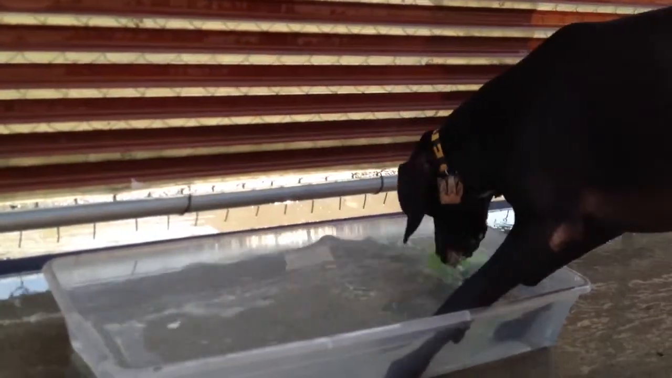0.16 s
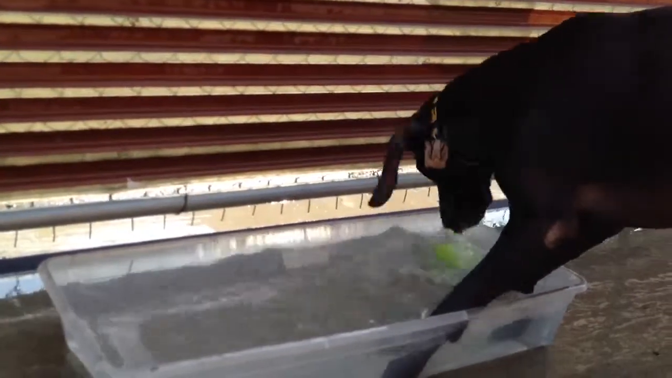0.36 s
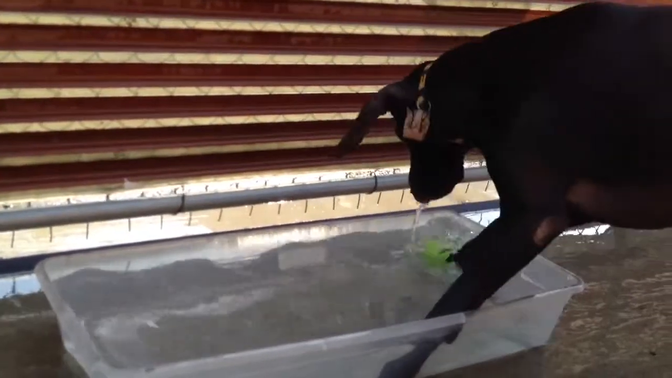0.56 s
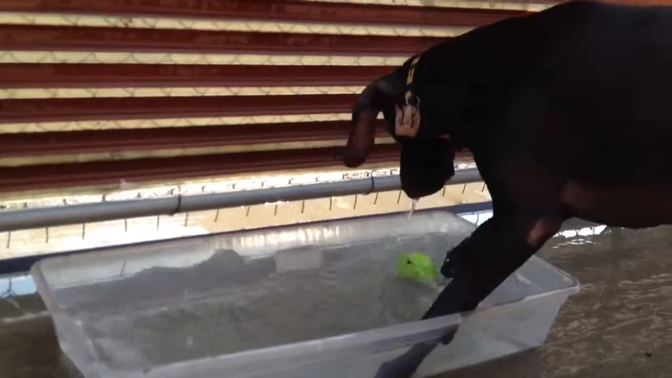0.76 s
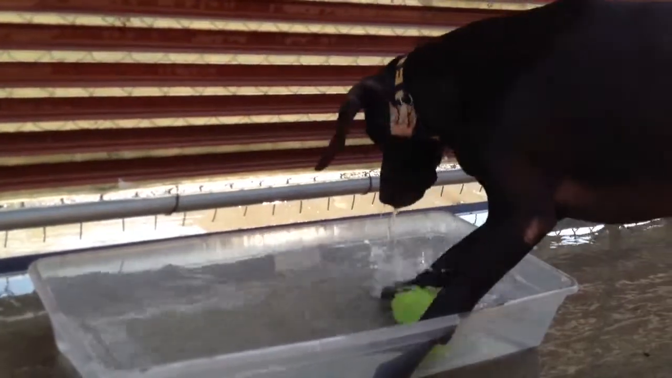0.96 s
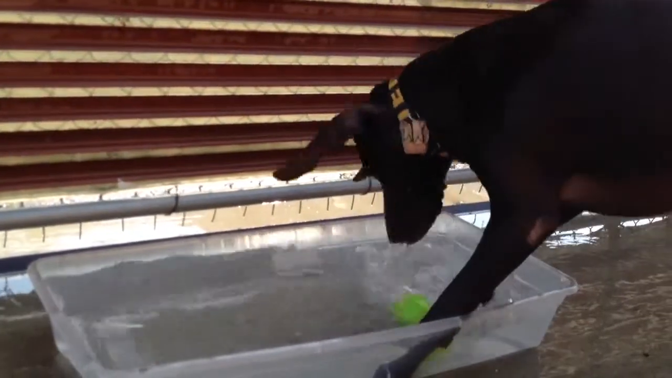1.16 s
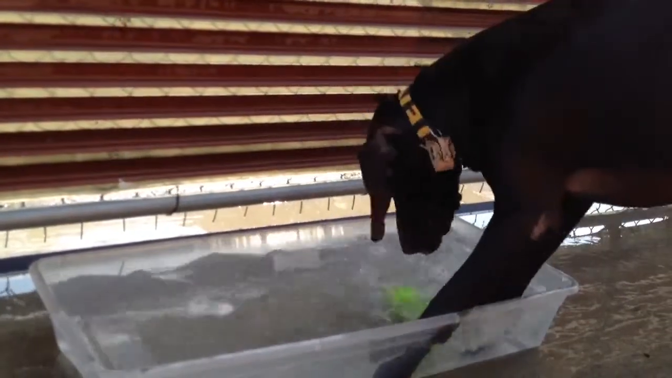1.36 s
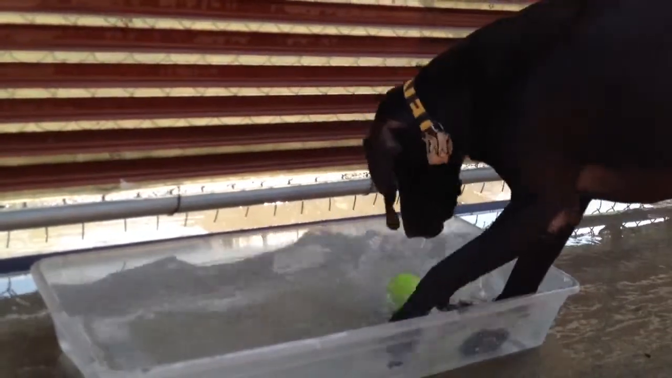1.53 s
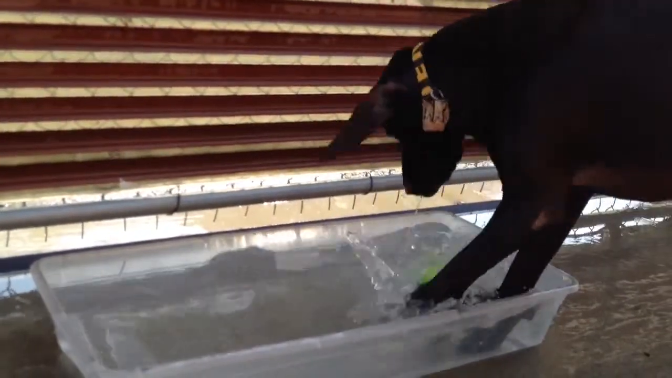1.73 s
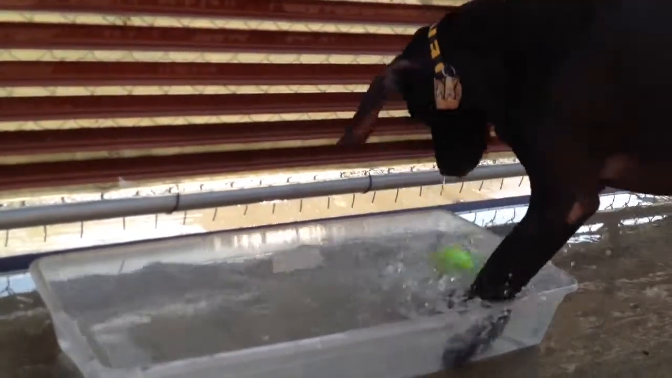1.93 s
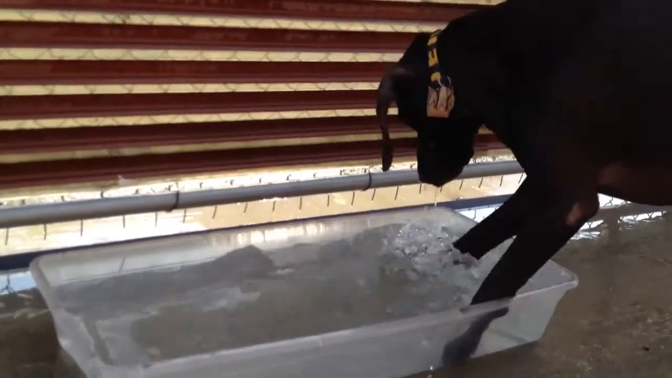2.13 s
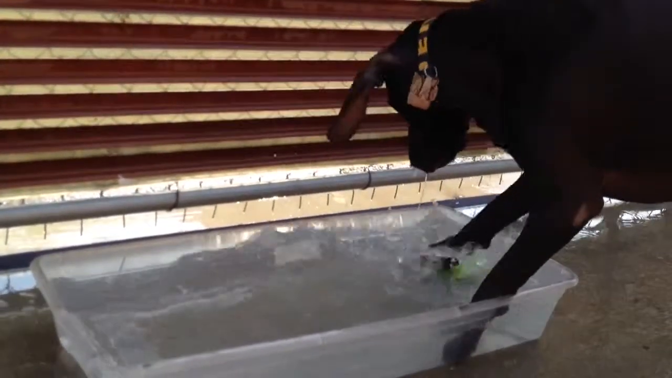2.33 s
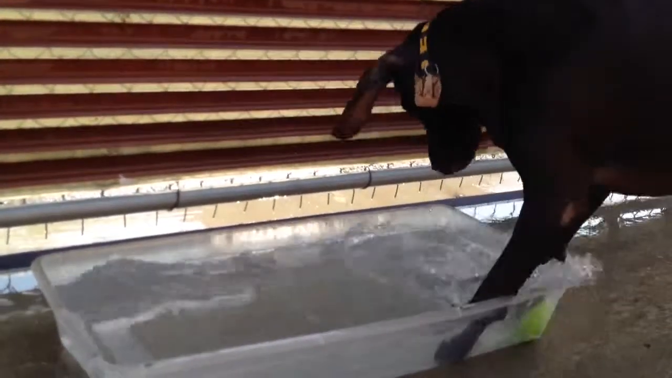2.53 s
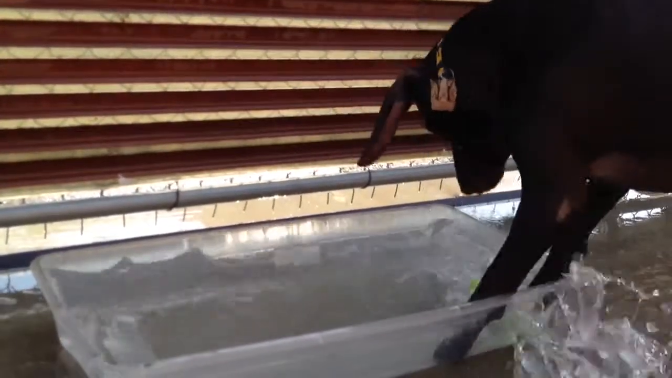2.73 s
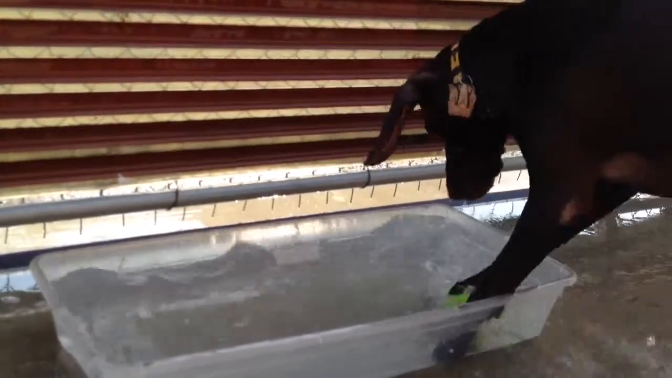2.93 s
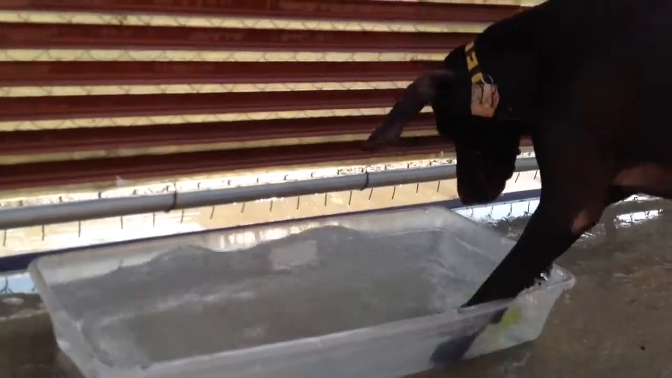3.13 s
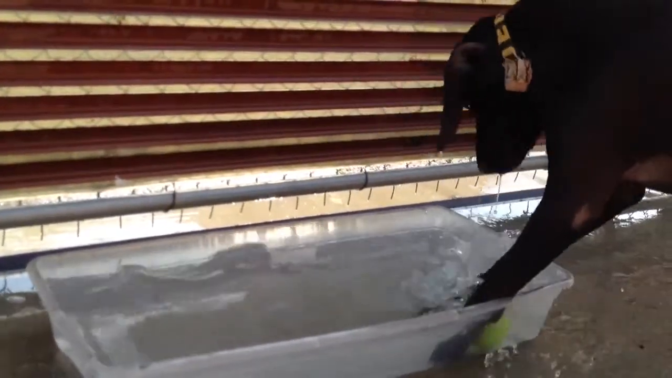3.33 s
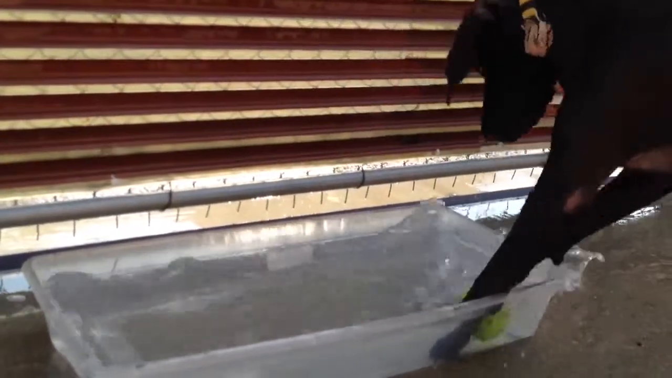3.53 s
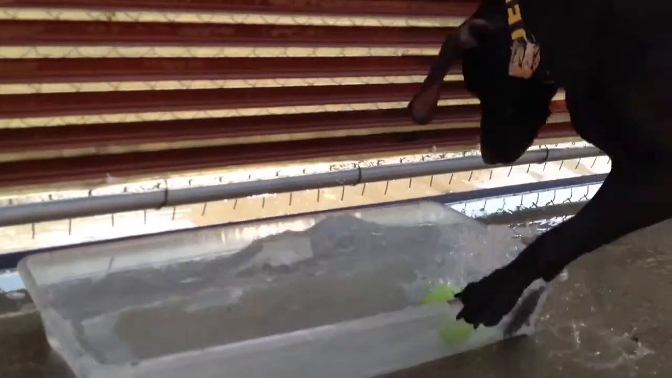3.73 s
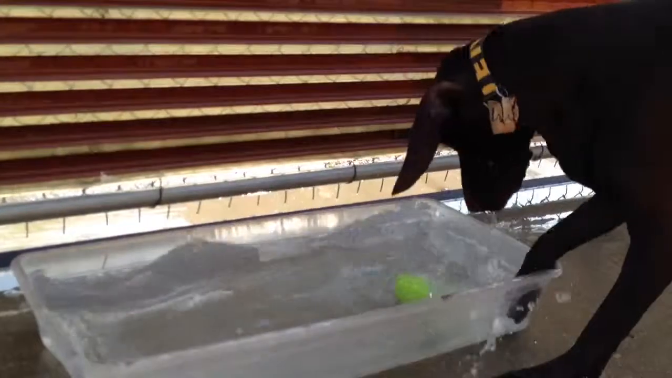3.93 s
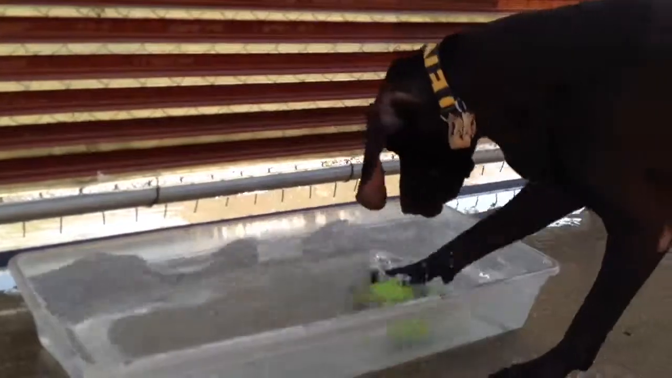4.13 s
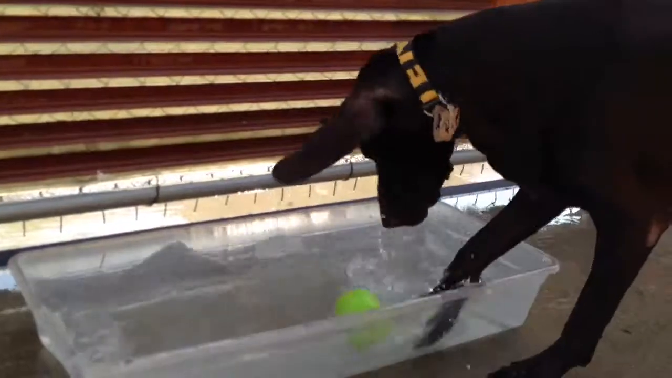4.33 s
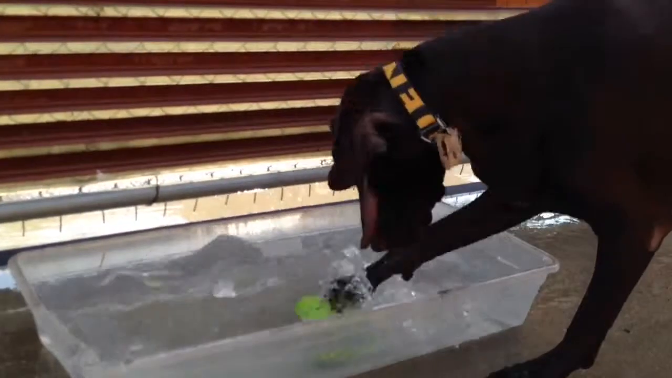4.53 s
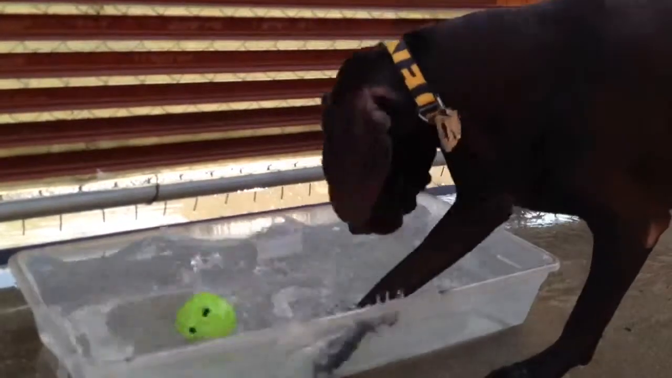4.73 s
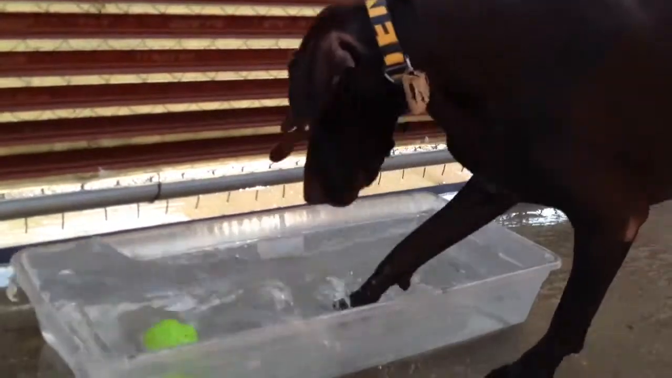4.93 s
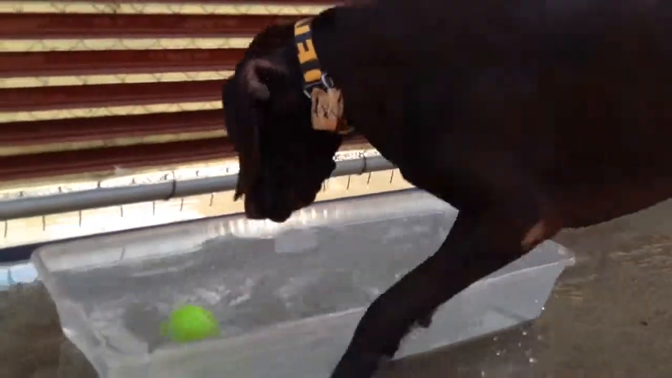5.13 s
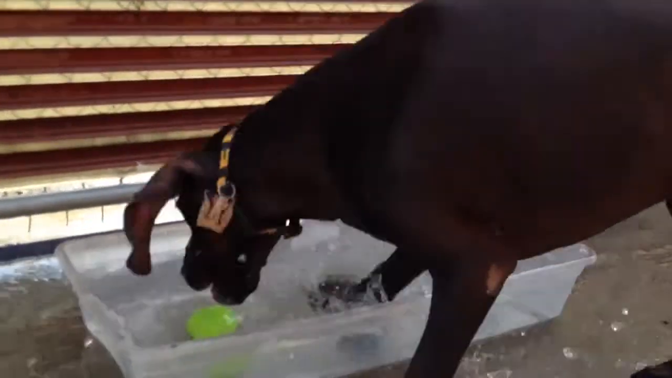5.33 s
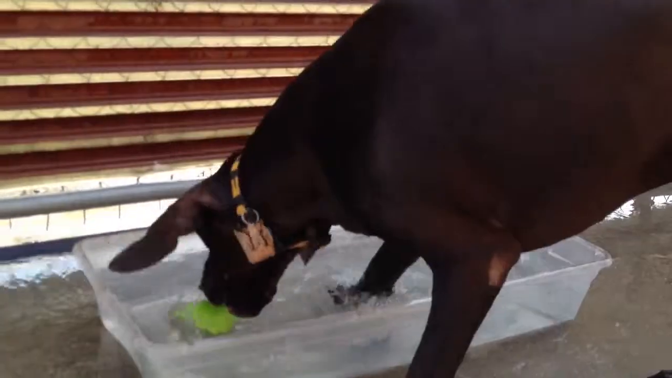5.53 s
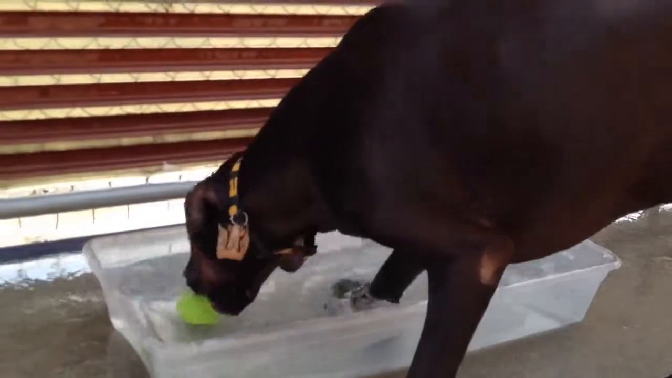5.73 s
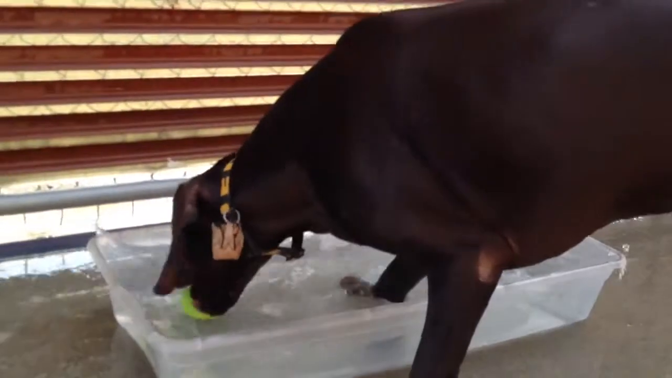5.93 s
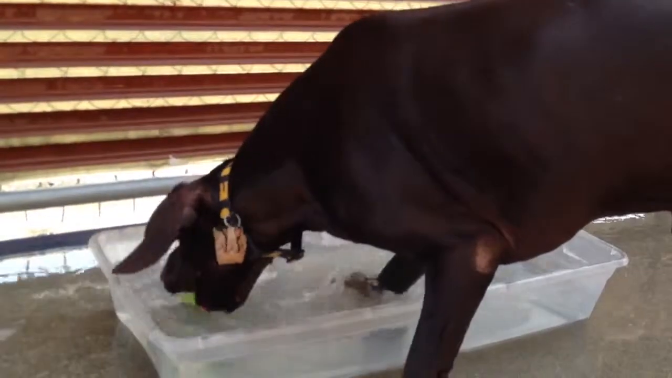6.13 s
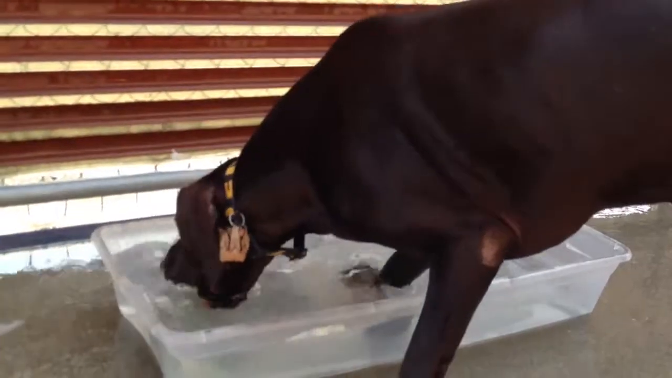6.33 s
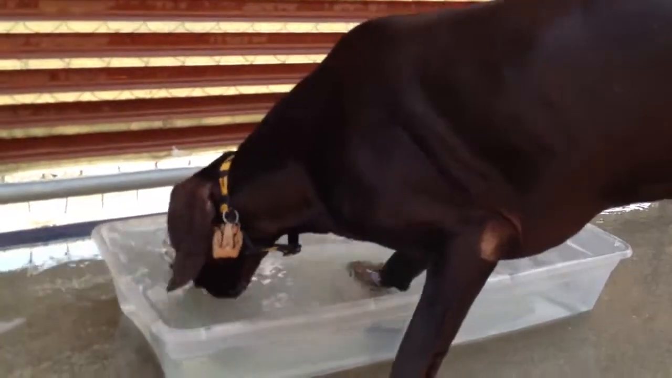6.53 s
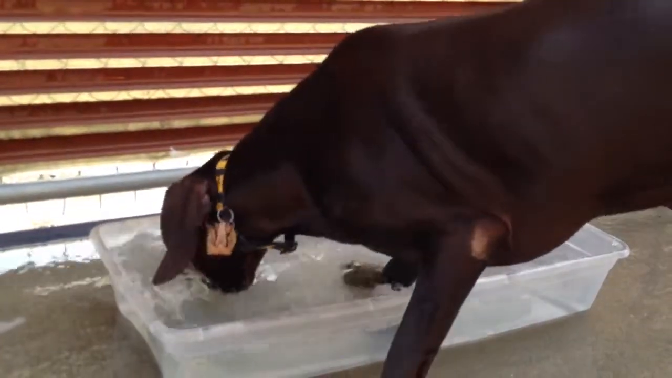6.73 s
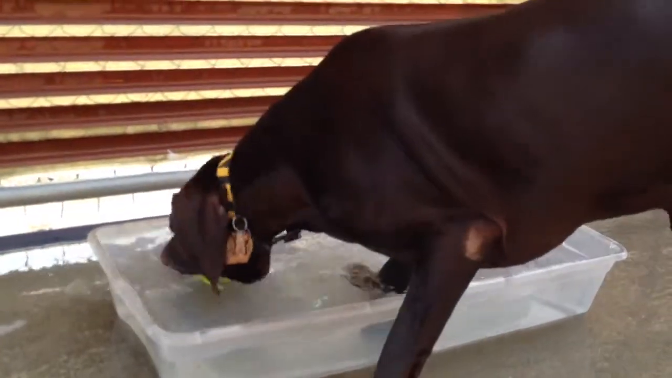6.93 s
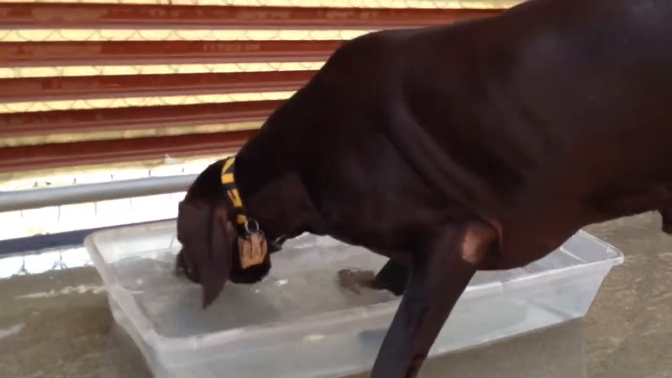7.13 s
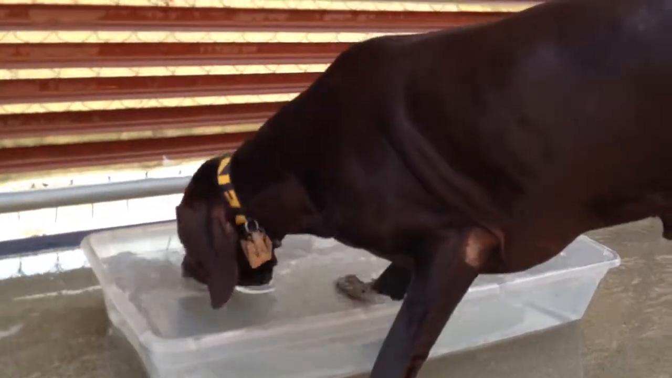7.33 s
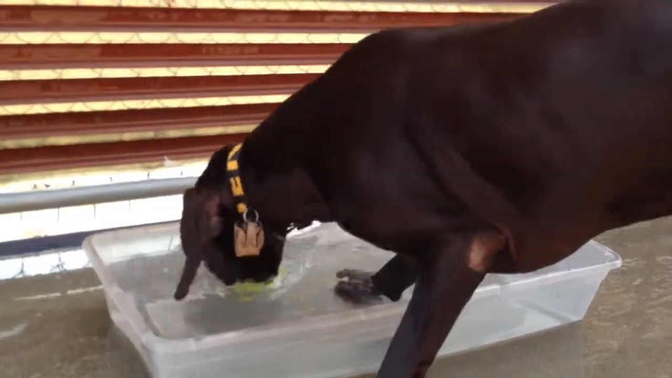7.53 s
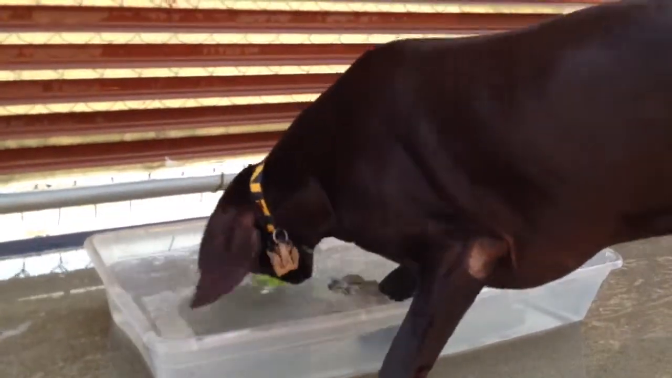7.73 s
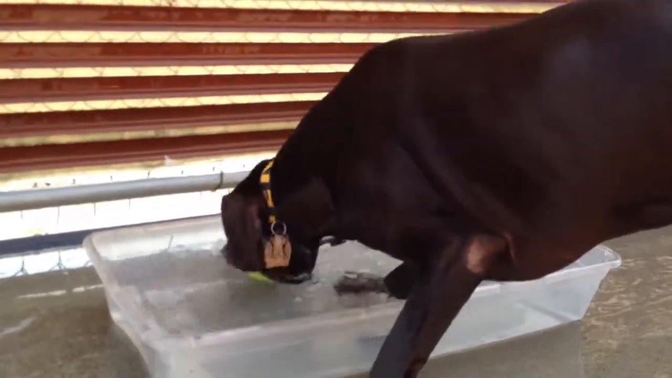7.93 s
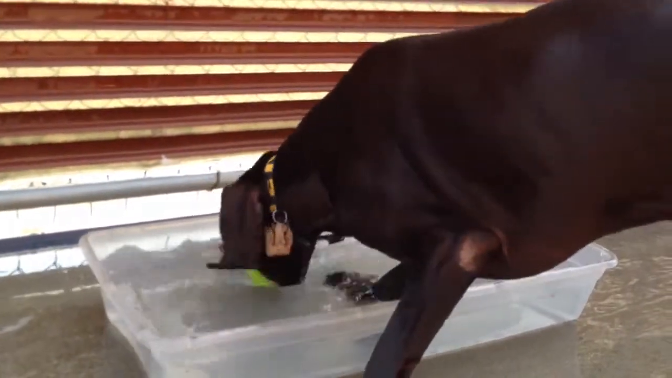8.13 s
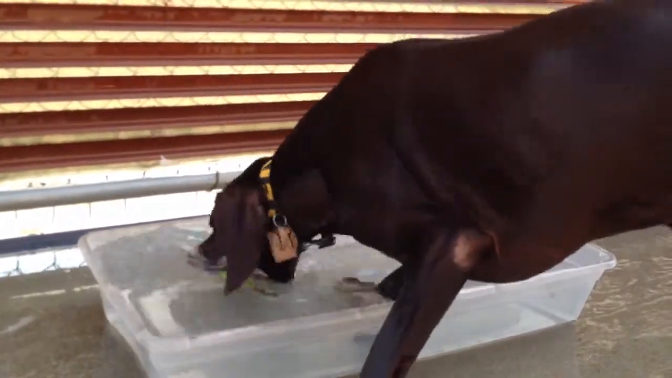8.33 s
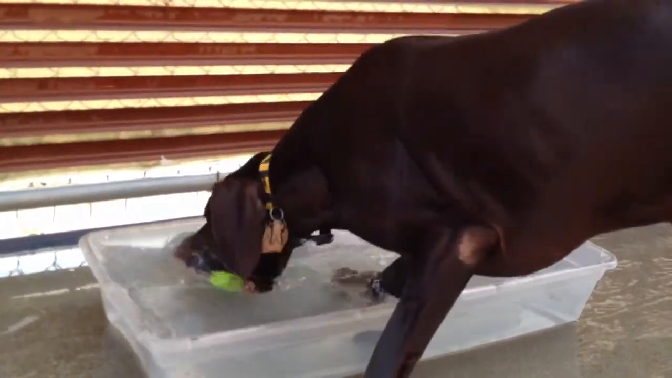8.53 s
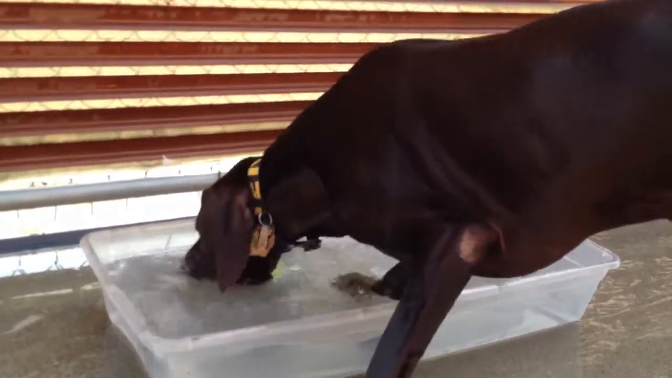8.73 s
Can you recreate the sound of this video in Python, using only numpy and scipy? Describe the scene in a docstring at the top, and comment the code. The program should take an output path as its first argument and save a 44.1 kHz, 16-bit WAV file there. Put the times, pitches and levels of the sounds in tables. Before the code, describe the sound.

Irregular splashing and hollow plops from a dog's paws in a plastic tub, easing into lighter drips and small gurgles.

```python
"""Sharp splashes and spattering drops, as a dog paws at a ball in a shallow plastic tub on concrete.
Each stroke traps air: the bubbles ring as mass-spring resonators, coloured by the tub's hollow, and
the strong, low ones drive its wall. Later the dog noses after the ball, and bubbles from its muzzle
glide up in pitch. Thrown water drips throughout, over a low distant rumble; reflection from a near
wall adds a short reverberation."""
import sys
import numpy as np
from scipy import signal
from scipy.fft import rfft, irfft, next_fast_len
from scipy.io import wavfile
from scipy.ndimage import uniform_filter1d

SR = 44100
rng = np.random.default_rng(int(sys.argv[2]) if len(sys.argv) > 2 else 0)


def digitize_waveform(pressure):
    """Quantize a signal to 16-bit integers and store it at the path in sys.argv[1].

    Rows of a 2-D input are taken as channels; values are limited to [-1, 1].
    """
    field = np.atleast_2d(pressure).T
    bounded = np.clip(field, -1, 1)
    quanta = np.round(bounded * 32767).astype(np.int16)
    wavfile.write(sys.argv[1], SR, quanta)


N = 390726


def gain_of(db):
    """Amplitude ratio of a level in decibels."""
    return 10 ** (np.asarray(db) / 20)


def unit_rms(x):
    """Normalisation to an rms of 1."""
    return x / np.sqrt(np.mean(x ** 2) + 1e-20)


def at_hz(points, hz):
    """Interpolation on a log-frequency axis."""
    f, value = np.transpose(points)
    return np.interp(np.log(hz + 1), np.log(f + 1), value)


def add(mix, start_s, sound):
    """Superposition of a sound on the mix."""
    part = mix[round(start_s * SR):][:len(sound)]
    part += sound[:len(part)]


def coloured(x, db_of_hz):
    """Zero-phase filtering by a gain curve."""
    size = next_fast_len(len(x))
    return irfft(rfft(x, size) * gain_of(db_of_hz(np.fft.rfftfreq(size, 1 / SR))), size)[:len(x)]


def steadied(x, window_s):
    """Division by the running rms removes slow level changes."""
    power = uniform_filter1d(x ** 2, round(window_s * SR))
    return x / np.sqrt(abs(power) + 1e-12)


def swell_powers(rows, fall_db_per_s, tail_db, tail_db_per_s, build_db=12):
    """Exponential growth, then double-slope decay: the power of each swell, every 64 samples."""
    peak_s, db, build_s = np.array(rows)[:, :3, None].transpose(1, 0, 2)
    late = np.arange(0, N, 64) / SR - peak_s
    before, after = np.minimum(late, 0), np.maximum(late, 0)
    fall = gain_of(-fall_db_per_s * after) ** 2 + gain_of(tail_db - tail_db_per_s * after) ** 2
    return gain_of(db + build_db * before / np.maximum(build_s, .005)) ** 2 * fall


def per_sample(x):
    """Linear interpolation from every 64th sample to every sample."""
    return np.interp(np.arange(N), np.arange(0, N, 64), x)


# Spectral shape of the ambient noise: frequency_hz, density_db
AMBIENT_SPECTRUM = [(18, -62), (30, -37), (95, -7), (160, 3), (299, -6.5), (467, -8.5), (546, -11.5),
                    (1140, -22.5), (2180, -28), (4540, -6), (5450, -6.5), (6890, -5), (11900, -6.5),
                    (15500, -4.5)]
def distant_rumble(level_db=-47, drift_db=2.3):
    """Gaussian noise, shaped into rumble and hiss, drifts in level over time and frequency."""
    frames, hz = N // 256 + 5, np.fft.rfftfreq(1024, 1 / SR)
    real, imag, patches = rng.standard_normal((frames, 513, 3)).T
    patches = unit_rms(uniform_filter1d(uniform_filter1d(patches, 8, 0), 14, 1))
    spectra = (real + 1j * imag) * gain_of(at_hz(AMBIENT_SPECTRUM, hz)[:, None] + drift_db * patches)
    return gain_of(level_db) * unit_rms(signal.istft(spectra, nperseg=1024, noverlap=768)[1][:N])


# Reverberation time by band: frequency_hz, t60_s
REVERB_TIMES = [(200, 0.33), (1000, 0.2), (4000, 0.12), (12000, 0.26)]
def wall_reflections(x):
    """Reverberation: sparse echoes of random sign decay at a different rate in each band."""
    taps, out = np.zeros((3, SR // 2)), np.zeros(N)
    slots = np.arange(200, SR // 2 - 20, 20)
    delays = slots + rng.integers(0, 20, (3, len(slots)))
    np.put_along_axis(taps, delays, rng.choice([-1., 1.], delays.shape), 1)
    hz, t, spectra = signal.stft(taps, SR, nperseg=256)
    decay = gain_of(-60 * t / at_hz(REVERB_TIMES, hz)[:, None])
    # three echo patterns crossfade in a steady cycle, keeping the tail free of ringing tones
    for k, tail in enumerate(signal.istft(spectra * decay, SR, nperseg=256)[1]):
        crossfade = np.sqrt(2 / 3) * np.cos(np.pi * (np.arange(N) / SR / .9 + k / 3))
        out += signal.fftconvolve(x * crossfade, tail / np.linalg.norm(tail))[:N]
    return out


def bubble(hz, cycles, rise):
    """Minnaert resonance: air is the spring and water the mass of a damped tone, rising in pitch."""
    age = np.arange(round(3 * cycles * SR / hz) + 8) * hz / SR / cycles
    envelope = np.exp(-2 * age) * np.minimum(age * cycles, 1)
    tone = np.sin(2 * np.pi * cycles * (age + rise * age ** 2 / 2)) * envelope
    return tone / np.linalg.norm(tone)


def swarm(lo_hz, hi_hz, per_s, spread_db, cycles, rise, weight=lambda hz, at: 1, sizes=24):
    """Shot noise: bubbles of many sizes ring at random moments, scaled by weight(hz, sample)."""
    when, size, strength, lot = rng.random((round(N / SR * 6000), 4)).T
    sounding = np.clip((per_s / 6000 - lot % .5 * 2) * 1e3, 0, 1)  # thins the candidates to per_s
    at, size = (when * N).astype(int), (size * sizes).astype(int)
    amplitude = sounding * np.sign(lot - .5) * gain_of(spread_db * np.minimum(-np.log(strength), 4))
    out = np.zeros(N)
    for k, hz in enumerate(np.geomspace(lo_hz, hi_hz, sizes)):
        onsets = at[size == k]
        impulses = np.bincount(onsets, amplitude[size == k] * weight(hz, onsets), N)
        out += signal.oaconvolve(impulses * np.sqrt(hz), bubble(hz, cycles, rise))[:N]
    return out


def spurts(per_s, fade_s, depth):
    """A Poisson process modulates the spray: each burst starts at once and fades exponentially."""
    starts = (rng.random(N) < per_s / SR) * rng.uniform(0.23, 1, N)
    swell = 1 + depth * signal.lfilter([1], [1, -np.exp(-1 / (fade_s * SR))], starts)
    return swell / uniform_filter1d(swell, round(.12 * SR))


# Dripping from paws, muzzle and rim: time_s, level_db, treble_share_db (the part above 7 kHz)
DRIPPING = [(0, -55, 2.5), (.3, -65, -3.5), (.55, -56, -1), (.8, -47.5, -4), (1.2, -43.5, -2),
            (1.57, -46.5, -1), (1.95, -42, -2.5), (2.4, -52, -1.5), (3.1, -51.5, -3.5), (3.8, -45.5, -1.5),
            (4.4, -46, -3.5), (4.85, -39.5, -2), (5.24, -50, -3.5), (5.7, -51.5, 0), (5.9, -46.5, -3),
            (6.5, -51, -1.5), (7.3, -51, -1.5), (8.1, -47.5, -1.5), (8.86, -48.5, -2)]
# Showers of thrown water: peak_s, level_db, build_s
THROWN_WATER = [(.137, -42, 0.085), (.399, -40.5, 0.059), (.72, -41.5, 0.23), (.943, -34.5, 0.023),
                (1.232, -45.5, 0.28), (1.746, -39, 0.17), (2.195, -35.5, 0.022), (2.689, -41, 1),
                (2.86, -29.5, 0.045), (3.073, -40, 0.037), (3.19, -44.5, 0.23), (3.29, -39, 0.015),
                (3.537, -43.5, 0.61), (3.637, -37.5, 0.048), (3.806, -37, 0.047), (3.896, -37.5, 0.03),
                (4.086, -42.5, 0.044), (4.205, -39, 0.029), (4.704, -44, 0.48), (5.058, -38.5, 0.02),
                (5.385, -37, 0.031), (5.622, -49.5, 0.34), (6.246, -57, 0.4), (6.64, -47.5, 0.021),
                (6.974, -47.5, 0.21), (7.24, -47, 0.085), (7.42, -46, 0.13), (7.54, -45, 0.064),
                (7.827, -54, 0.12), (8.36, -48.5, 0.2), (8.675, -45.5, 0.057)]
# Spectral shape of the spatter: frequency_hz, gain_db
SPATTER_SPECTRUM = [(880, -27), (1500, -1.5), (2890, -1.5), (3610, 2), (4710, 5.5), (5450, 0.5),
                    (7160, -2.5), (9700, -10.5), (11900, -9), (14600, -13.5), (15500, -39)]
def spray(mist_db=-7, drops_db=-5, patchy_db=2.5):
    """Incoherent sources add in power: drips and showers of tiny drops tick over a fine mist."""
    time_s, *columns = np.transpose(DRIPPING)
    drip_db, treble_db = (np.interp(np.arange(N) / SR, time_s, column) for column in columns)
    showers = swell_powers(THROWN_WATER, fall_db_per_s=119, tail_db=-5.5, tail_db_per_s=76).sum(0)
    level = np.sqrt(gain_of(drip_db) ** 2 + per_sample(showers))
    drops = swarm(1885, 14700, per_s=2000, spread_db=2.0, cycles=8.7, rise=0.44)
    spatter = gain_of(drops_db) * unit_rms(drops) + gain_of(mist_db) * rng.standard_normal(N)
    spectra = signal.stft(coloured(spatter, lambda hz: at_hz(SPATTER_SPECTRUM, hz)), nperseg=256)[2]
    patches = rng.standard_normal(spectra.shape[::-1]).T  # the colour varies from moment to moment
    patches = unit_rms(uniform_filter1d(uniform_filter1d(patches, 9, 0), 10, 1))
    spatter = signal.istft(spectra * gain_of(patchy_db * patches), nperseg=256)[1][:N]
    low = coloured(spatter, lambda hz: -10 * np.log10(1 + (hz / 7000) ** 8))
    high = steadied(spatter - low, 0.17) * gain_of(treble_db)
    high *= spurts(per_s=14, fade_s=0.022, depth=1.37)
    low_share = np.sqrt(np.clip(1 - gain_of(2 * treble_db), .03, 1))
    swish = uniform_filter1d(spurts(per_s=10, fade_s=.03, depth=0.9), 700)
    low = steadied(low, 0.44) * swish
    body = coloured(low, lambda hz: -10 * np.log10(1 + (hz / 2900) ** 8))
    heavy = np.clip(level / gain_of(-42), 0, 1) ** 0.68  # only heavy spray keeps its middle tones
    return level * (high + low_share * (low - (1 - heavy) * body))


# Bubbles from the muzzle: start_s, level_db, start_hz, top_hz, sweep_s
MUZZLE_GLIDES = [(6.39, -50, 2410, 3600, 0.016), (7.086, -45, 627, 950, 0.033),
                 (7.337, -57, 301, 1040, 0.074), (7.564, -48.5, 1180, 2830, 0.041),
                 (7.59, -52, 482, 1290, 0.046), (7.679, -53, 1700, 2850, 0.02),
                 (7.726, -45.5, 425, 1250, 0.05), (7.937, -55.5, 863, 1590, 0.037)]
def muzzle_bubbles(roughness=0.42, tail_db=-7, tail_s=0.033):
    """Mass loading falls as a bubble surfaces, so its pitch climbs; a short gurgle then sinks back."""
    out = np.zeros(N)
    for start_s, db, start_hz, top_hz, sweep_s in MUZZLE_GLIDES:
        t = np.arange(round((sweep_s + tail_s) * SR)) / SR
        sweep, tail = np.minimum(t / sweep_s, 1), np.maximum(t - sweep_s, 0) / tail_s
        wobble, flutter = uniform_filter1d(rng.standard_normal((2, len(t))), 120)
        hz = (start_hz + (top_hz - start_hz) * sweep ** 1.52) * (1 - 0.28 * tail)
        hz *= 1 + (0.055 + 0.13 * tail) * unit_rms(wobble)  # the film wobbles
        envelope = gain_of(db - 3.9 * sweep + tail_db * np.minimum(5 * tail, 1))
        envelope *= (1 + roughness * unit_rms(flutter)) * signal.windows.tukey(len(t), .25)
        add(out, start_s, envelope * np.sin(2 * np.pi * np.cumsum(hz) / SR))
    return out


# Sheets and drops that land hard: start_s, relative_level_db, centre_hz, width_octaves, t60_s
WATER_IMPACTS = [(0.0555, -24.5, 10200, 1.7, 0.16), (0.09, -23, 8100, 1.2, 0.08),
                 (0.23, -28.5, 3500, 1.8, 0.042), (0.302, -23, 4300, 0.92, 0.14),
                 (0.3716, -15.5, 11300, 1.3, 0.057), (0.3977, -19, 3560, 0.21, 0.055),
                 (0.584, -20.5, 6970, 0.38, 0.065), (0.629, -23.5, 4170, 0.66, 0.039),
                 (0.7648, -21, 4400, 0.5, 0.064), (0.79, -22.5, 8600, 0.8, 0.044),
                 (0.856, -21.5, 3080, 0.75, 0.05), (0.926, -14, 7460, 2.4, 0.093),
                 (1.022, -12.5, 8500, 1.9, 0.094), (1.624, -17.5, 8640, 1.8, 0.063),
                 (1.7445, -22, 4200, 0.21, 0.057), (1.788, -22.5, 4250, 1.3, 0.33),
                 (1.84, -19.5, 4100, 1.4, .07), (1.944, -20.5, 4660, 0.85, 0.057),
                 (2.175, -16.5, 4500, 1.5, 0.11), (2.6407, -19.5, 2610, 1.7, 0.069),
                 (2.675, -21.5, 4780, 0.44, 0.11), (2.8313, -16.5, 3500, 1.6, 0.07),
                 (2.844, -11, 3590, 1.05, 0.16), (3.3254, -15.5, 4770, 0.56, 0.099),
                 (3.522, -18.5, 4650, 2.3, 0.048), (3.63, -21, 3550, 0.68, 0.092),
                 (3.681, -21.5, 2970, 1.3, 0.44), (3.797, -10, 3990, 1, 0.077),
                 (3.845, -6.5, 10300, 1.9, 0.049), (3.8848, -11, 4970, 1.4, 0.11),
                 (4.077, -23, 3600, 1.6, 0.067), (4.16, -24, 2480, 0.83, 0.045),
                 (4.194, -17.5, 2370, 1.36, 0.063), (4.2528, -17, 2550, 1.5, 0.21),
                 (5.05, -20.5, 4200, 1, 0.15), (5.1355, -22, 4550, 0.89, 0.16),
                 (5.284, -12, 5650, 1.4, 0.05), (5.289, -9, 6470, 1.3, 0.096),
                 (5.353, -23, 4550, 0.89, 0.05), (5.368, -30, 2750, 1.4, 0.13),
                 (5.6285, -16, 6400, 2.4, 0.059), (5.9837, -18, 4870, 2.4, 0.089),
                 (6.1293, -24, 3950, 2.5, 0.14), (6.2305, -21, 11500, 1.8, 0.081),
                 (6.624, -23, 12200, 1.7, 0.088), (6.71, -18, 12200, 1.5, 0.073),
                 (6.7457, -21, 11000, 0.87, 0.064), (6.7766, -25, 6960, 0.59, 0.066),
                 (6.965, -30, 4240, 0.62, 0.099), (7.006, -28, 4800, 0.72, 0.077),
                 (7.105, -18, 8060, 0.26, 0.071), (7.3, -28.5, 6900, 0.64, 0.09),
                 (7.3985, -28, 4030, 1, 0.12), (7.8147, -29, 4950, 0.75, 0.067),
                 (7.9, -36, 4300, 0.7, 0.06), (8.045, -33, 4030, 0.87, 0.098), (8.151, -25, 6030, 1, .05),
                 (8.274, -25, 7500, 1.1, 0.054), (8.3109, -31, 3600, .8, 0.091),
                 (8.3438, -22, 7750, 1.3, 0.14), (8.396, -27, 4500, 0.89, 0.18),
                 (8.443, -32.5, 4260, 0.62, 0.081), (8.5866, -33, 4100, 1.1, 0.065),
                 (8.658, -24.5, 4600, 0.83, 0.1)]
def splashes(tick_db=-19.5, trim_db=-7, plink_db=5):
    """Impact noise: a crack and a fast-dying crackle; narrow bands carry a single drop's pitch."""
    out, t = np.zeros(N), np.arange(8192) / SR
    noises, crackles = rng.standard_normal((2, len(WATER_IMPACTS), len(t)))
    for (start_s, db, centre_hz, octaves, t60), noise, crackle in zip(WATER_IMPACTS, noises, crackles):
        def band_db(hz):
            peak = -6 * (np.log2((hz + 1) / centre_hz) / octaves) ** 2
            return np.maximum(peak, -20) - 12 * (2200 / (hz + 300)) ** 2
        noise = noise * gain_of(1.26 * unit_rms(uniform_filter1d(crackle, 24)))
        plink = np.sin(2 * np.pi * centre_hz * (t + .6 * t ** 2)) * np.exp(-t / 0.013)
        burst = unit_rms(coloured(noise, band_db)) + gain_of(plink_db - 5.5 * octaves) * plink
        attack = np.minimum(t / (0.0094 * t60), 1)
        decay = gain_of(-60 * t / t60) + gain_of(tick_db) * np.exp(-t / 0.0035)
        add(out, start_s, gain_of(db + trim_db) * burst * attack * decay / 2)
    return out


# Normal modes of the tub wall: frequency_hz, relative_level_db, t60_s
TUB_MODES = [(244, 0.5, 0.19), (385, 2.5, 0.092), (483, 6, 0.082), (675, 9.5, 0.04)]
# Air pockets closing behind a paw: start_s, relative_level_db, pitch_hz, t60_s
AIR_POCKETS = [(0.656, -37.5, 487, 0.15), (0.682, -44, 502, 0.075), (0.863, -32, 1397, 0.068),
               (0.897, -30, 1310, 0.24), (0.929, -29.5, 1020, 0.12), (0.964, -28, 1016, 0.042),
               (0.978, -28, 514, 0.1), (1.017, -33, 430, 0.15), (1.03, -30, 553, 0.11),
               (1.046, -30, 501, 0.15), (1.097, -29.5, 530, 0.087), (1.133, -37, 389, 0.14),
               (1.165, -33.5, 795, 0.083), (1.29, -36.5, 454, .1), (1.291, -37, 1290, 0.13),
               (1.332, -35, 1290, 0.087), (1.505, -35, 716, 0.063), (1.677, -36, 1190, 0.12),
               (1.717, -26.5, 1340, 0.12), (1.748, -30, 479, 0.16), (1.795, -29, 400, 0.12),
               (1.797, -25.5, 900, 0.061), (2.178, -24, 1014, 0.1), (2.351, -37, 2220, 0.03),
               (2.388, -35, 1200, 0.031), (2.413, -34, 686, 0.041), (2.575, -37, 2210, 0.19),
               (2.689, -29, 1330, 0.049), (3.045, -28, 1110, 0.042), (3.085, -19, 1230, 0.034),
               (3.341, -27.5, 1070, 0.043), (3.379, -28, 950, 0.039), (3.688, -15.5, 1180, 0.024),
               (3.781, -28.5, 915, 0.094), (3.824, -21.5, 495, 0.04), (3.84, -14.5, 380, 0.045),
               (3.839, -21, 820, 0.046), (4.157, -25.5, 473, 0.035), (4.231, -36, 1070, 0.047),
               (4.3, -33, 730, 0.052), (4.345, -31.5, 670, 0.054), (4.634, -27, 1806, 0.049),
               (4.689, -21.5, 385, 0.03), (4.887, -31.5, 628, 0.14), (5.057, -27.5, 645, 0.083),
               (5.127, -18, 1310, 0.027), (5.258, -27.5, 532, 0.033), (5.379, -35, 1400, 0.044),
               (5.431, -37, 946, 0.13), (5.474, -38, 546, 0.082), (5.619, -45, 483, 0.08),
               (6.093, -43, 460, 0.093), (6.42, -45, 453, 0.13), (6.836, -42, 263, 0.097),
               (7.258, -37, 1890, 0.022), (7.45, -30.5, 615, 0.024), (7.814, -30, 1495, 0.023)]
def paw_plops(rise=0.88, slap_db=-12, trim_db=-5, knock_db=-42):
    """Free vibration: a pocket rings with two neighbours and a slap; strong low ones drum the tub."""
    out, t = np.zeros(N), np.arange(6000) / SR
    noises = rng.standard_normal((len(AIR_POCKETS), len(t)))
    draws = rng.random((len(AIR_POCKETS), 4 + len(TUB_MODES)))
    for (start_s, db, hz, t60), noise, draw in zip(AIR_POCKETS, noises, draws):
        turns = hz * (t + rise * t ** 2)
        ring = np.sin(2 * np.pi * turns)
        ring += 0.52 * np.sin(2 * np.pi * (turns * (.78 + 0.169 * draw[0]) + draw[1]))
        ring += 0.24 * np.sin(2 * np.pi * (turns * (1.4 + 0.26 * draw[2]) + draw[3]))
        slap = unit_rms(coloured(noise, lambda f: -14 * np.log2((f + 1) / hz) ** 2))
        pocket = (ring + gain_of(slap_db) * slap) * gain_of(db + trim_db - 60 * t / t60)
        wall = sum(gain_of(mode_db - 60 * t / mode_t60) * np.sin(2 * np.pi * (mode_hz * t + phase))
                   for (mode_hz, mode_db, mode_t60), phase in zip(TUB_MODES, draw[4:]))
        drive = gain_of(knock_db + 1.3 * (db + 20) - 4 * np.log2(hz / 450))
        attack = 1 - np.exp(-t * hz / 1.26)
        add(out, start_s, (pocket + drive * wall) * attack)
    return out


# Resonances of the tub's hollow: centre_hz, width_hz, gain_db
CAVITY_RESONANCES = [(479, 24, 3), (950, 140, 2), (1290, 300, 4.5), (1862, 166, 6.5), (2310, 290, 6.5)]
# Surges stirred by paws and muzzle: peak_s, level_db, build_s, bubble_pitch_hz
WATER_SURGES = [(.1, -58, 0.092, 580), (.27, -53, 0.11, 1590), (.72, -51, 0.084, 1740),
                (.983, -38, 0.027, 523), (1.09, -42, 0.16, 520), (1.182, -43.5, 0.038, 1850),
                (1.302, -54, 0.087, 1290), (1.41, -52.5, 0.12, 1800), (1.726, -42.5, 0.038, 1290),
                (1.809, -37.5, 0.033, 900), (1.966, -50.5, 0.051, 950), (2.065, -47.5, 0.012, 2280),
                (2.196, -34.5, 0.056, 1270), (2.45, -44.5, 0.031, 680), (2.585, -42.5, 0.037, 2200),
                (2.706, -39, 0.2, 1350), (2.854, -39, 0.069, 1700), (3.098, -40.5, 0.15, 1300),
                (3.19, -41, 0.083, 1700), (3.293, -43, 0.02, 1440), (3.397, -39.5, 0.067, 1070),
                (3.627, -49.5, 0.17, 1360), (3.698, -33.5, 0.037, 900), (3.836, -32, 0.042, 445),
                (4.171, -46.5, 0.015, 2280), (4.255, -37.5, 0.048, 1330), (4.355, -41, 0.04, 600),
                (4.535, -45.5, 0.14, 1010), (4.64, -39.5, 0.012, 1850), (4.704, -35, 0.056, 1020),
                (4.904, -45.5, 0.35, 684), (5.063, -36.5, 0.018, 700), (5.143, -40, 0.025, 1320),
                (5.273, -47.5, 0.012, 520), (5.383, -48, 0.072, 1770), (7.109, -62, 0.017, 780),
                (7.588, -58, 0.18, 560)]
def churn(lap_db=-66.5, lap_hz=520, width_octaves=0.95, rush_db=-7, slosh_db=-20):
    """Cavity resonance colours the bubbles and rush of each surge; the water laps in between."""
    surges = swell_powers(WATER_SURGES, fall_db_per_s=227, tail_db=-18, tail_db_per_s=28)
    lap = gain_of(lap_db) ** 2
    power = surges.sum(0) + lap
    log_pitches = np.log(np.array(WATER_SURGES)[:, 3])
    pitch = per_sample(np.exp((log_pitches @ surges + np.log(lap_hz) * lap) / power))  # loudest leads
    def favour_pitch(hz, at):
        return (1 + np.exp(-np.log2(hz / pitch[at]) ** 2 / width_octaves ** 2)) / np.sqrt(hz)
    def cavity_db(hz):
        return sum(db / (1 + (2 * (hz - centre) / width) ** 2) for centre, width, db in CAVITY_RESONANCES)
    bubbles = swarm(369.4, 3148, per_s=1300, spread_db=4.5, cycles=13.8, rise=0.046, weight=favour_pitch)
    rush = coloured(rng.standard_normal(N), lambda hz: -9 * np.log2((hz + 1) / 1100) ** 2)
    froth = coloured(steadied(bubbles, 0.11) + gain_of(rush_db) * unit_rms(rush), cavity_db)
    slosh = coloured(rng.standard_normal(N), lambda hz: -8 * np.log2((hz + 1) / 170) ** 2)
    heave = per_sample(np.sqrt(uniform_filter1d(power, 120)))  # the whole tubful moves more slowly
    froth = per_sample(np.sqrt(power)) * steadied(froth, 0.255)
    return froth + gain_of(slosh_db) * heave * unit_rms(slosh)


def scene(reverb_db=-9.5):
    """Superposition of the direct sound of the water, its reflections and the background."""
    water = splashes() + paw_plops() + muzzle_bubbles() + spray() + churn()
    return (water + gain_of(reverb_db) * wall_reflections(water) + distant_rumble())[None]


# Frequency response of a small microphone: frequency_hz, gain_db
MIC_RESPONSE = [(30, -4), (70, -10), (100, 3.5), (3000, 3.5), (4600, 1), (5400, -4), (6500, -1)]
def record(dry, cutoff_hz=15450):
    """Linear filtering: a microphone with weak deep bass and a treble dip, then a steep low-pass."""
    heard = coloured(dry[0], lambda hz: at_hz(MIC_RESPONSE, hz))[None]
    low_pass = signal.firwin(511, cutoff_hz, window=("kaiser", 9), fs=SR)
    return signal.oaconvolve(heard, low_pass[None], "same")


dry = scene()
out = record(dry)
digitize_waveform(out)
```